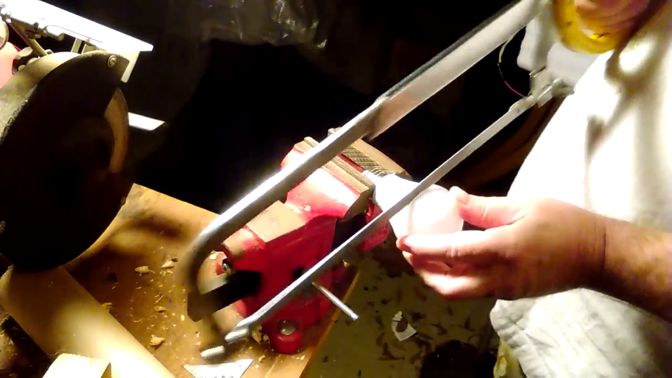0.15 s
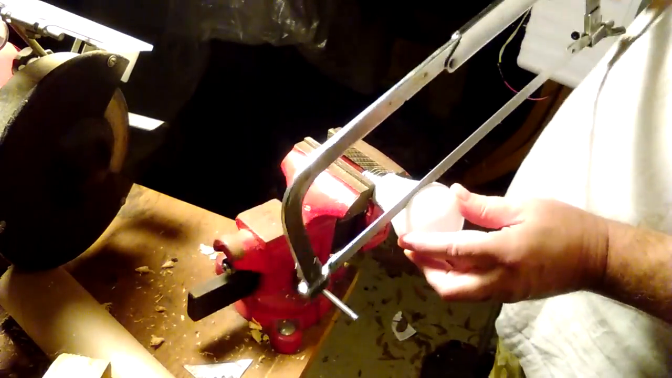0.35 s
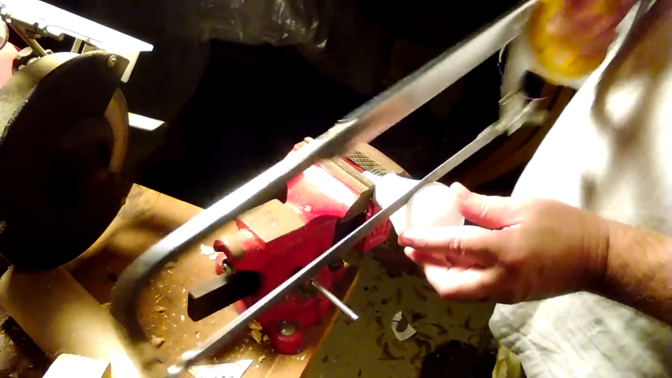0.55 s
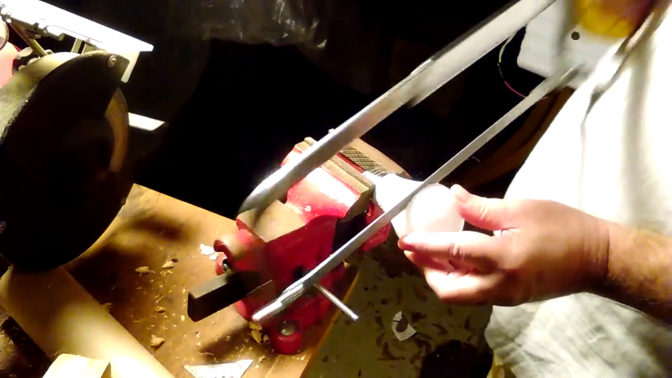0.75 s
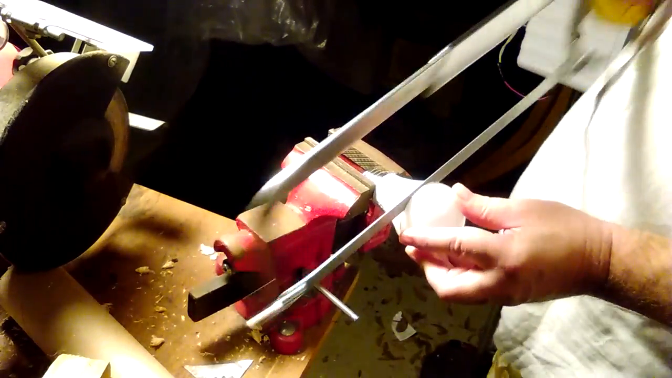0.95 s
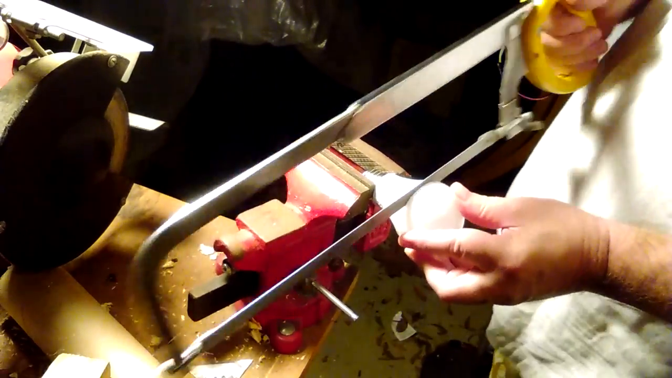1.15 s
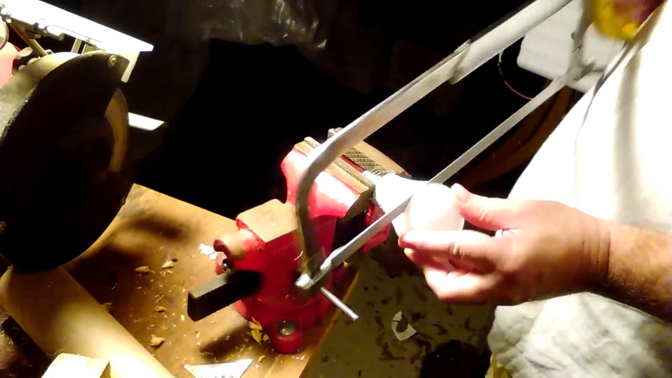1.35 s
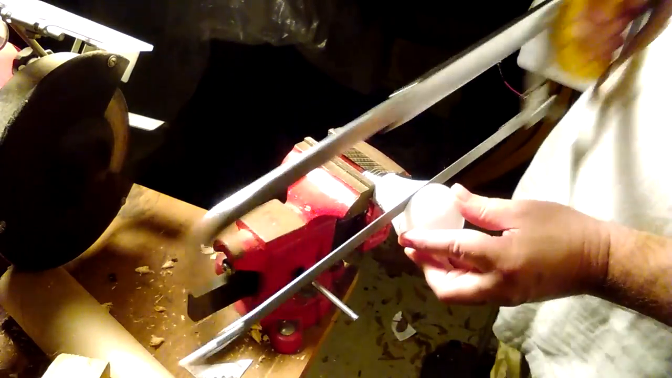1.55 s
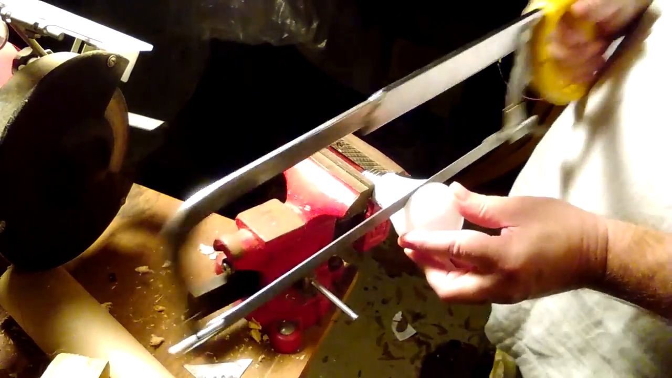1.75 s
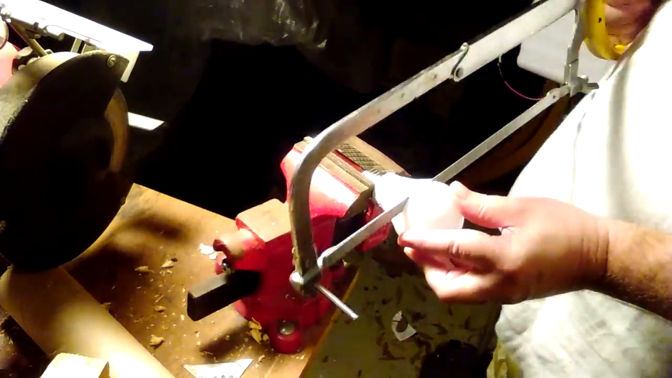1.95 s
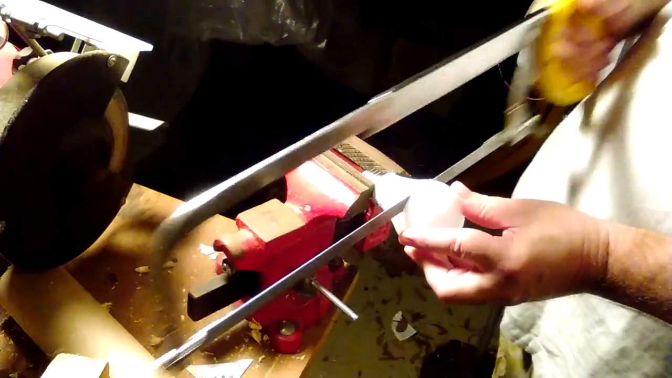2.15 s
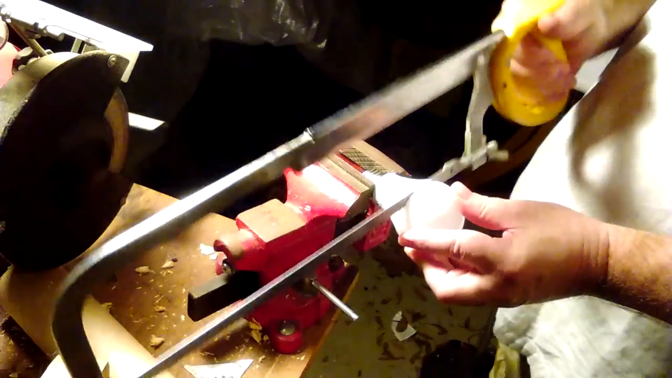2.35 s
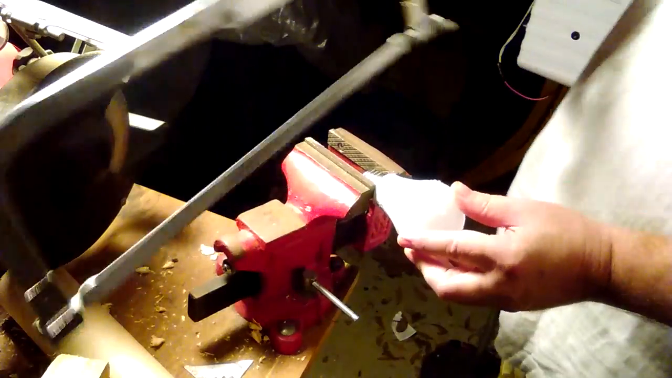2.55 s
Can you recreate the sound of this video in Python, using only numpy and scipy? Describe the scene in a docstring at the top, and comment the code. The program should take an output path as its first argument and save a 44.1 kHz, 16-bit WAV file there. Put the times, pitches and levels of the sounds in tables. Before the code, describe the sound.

Loud, harsh hacksaw strokes grind through a clamped plastic piece, ending in a sharp metallic clack

```python
"""Hand hacksaw in plastic

A hand hacksaw cuts a plastic piece held in a vise, close by in a garage: eight strokes, pull and push in turn.
Teeth catch at a rate that follows the arm's speed: clicks drum on the piece, torn chips make the blade hiss and ring.
Shaped noise adds rasp, grinding, bench rumble and background. At the end the blade breaks through and the saw
clacks free, ringing its frame modes. The loud sound overloads the recorder a little: limiter, then soft clipping."""
import sys
import numpy as np
from scipy import signal
from scipy.fft import rfft, irfft
from scipy.io import wavfile

SR = 44100
rng = np.random.default_rng(int(sys.argv[2]) if len(sys.argv) > 2 else 0)


def pcm_store(signal):
    """Save signal as 16-bit PCM."""
    levels = np.round(np.clip(np.atleast_2d(signal), -1, 1) * 32767)
    wavfile.write(sys.argv[1], SR, levels.astype(np.int16).T)


N = 119070
T = np.arange(N) / SR

# steady background noise: (frequency [Hz], level [dB])
BACKGROUND_COLOUR = [(20, -5.5), (55, 0), (100, -3.5), (200, -13), (400, -20.5), (1000, -30), (3000, -36.5),
                     (7000, -35.5), (14000, -53.5)]
# saw knocks, finally clacks free: (time [s], level [dB], decay time [s])
KNOCKS = [(0.017, -30, 0.0041), (0.0324, -30, 0.0038), (0.067, -33.5, 0.0038), (0.1904, -18, 0.0032),
          (1.749, -11, 0.0036), (2.326, -12, 0.0061), (2.3454, -16, 0.0087), (2.411, -16.5, 0.014),
          (2.4302, -6.5, .005), (2.4368, -1.5, 0.0034), (2.622, -31.5, 0.0032), (2.6914, -51, 0.0017)]
# spectrum of a knock: (frequency [Hz], level [dB])
KNOCK_COLOUR = [(100, -10.5), (600, -19), (1300, 1.5), (2600, -7.5), (4400, 5), (6000, 7.5), (7700, 4.5),
                (9200, -15.5), (14000, -22)]
# modes of the free frame: (frequency [Hz], level [dB], T60 [s])
FRAME = [(1270, -44, .25), (1852, -49, 1.2), (3284, -46, .6), (3564, -32, .5), (3700, -38, .45),
         (4005, -42, .75), (4490, -43, .65), (7327, -33, .18), (7779, -34, .16)]
# piece shudders and bench rumbles, mostly near the turns of the arm:
# (time [s], rumble level [dB], Gaussian width [s], piece level [dB])
JOLTS = [(0.024, -40, 0.019, -38.5), (0.356, -23.5, 0.046, -23), (0.49, -29, 0.043, -40),
         (0.727, -24, 0.027, -21), (0.938, -23, 0.072, -28.5), (1.127, -38, 0.022, -19.5),
         (1.253, -29, 0.059, -29), (1.47, -24.5, 0.043, -30.5), (1.704, -27, .02, -31),
         (1.79, -23, 0.041, -25.5), (1.993, -19, 0.019, -43), (2.059, -16, 0.017, -15.5),
         (2.274, -28, 0.051, -20.5)]
# spectrum of the bench rumble: (frequency [Hz], level [dB])
JOLT_COLOUR = [(25, -29.5), (50, -2.5), (95, -5.5), (200, -10), (300, -17.5), (900, -39.5)]
# saw strokes, pull and push in turn: (start [s], end [s], rise [s], fall [s], top tooth rate [Hz],
# blade level [dB], piece level [dB], rasp level [dB], smoothness at top speed [0-1],
# blade level change over the stroke [dB], piece and rasp level change over the stroke [dB])
STROKES = [ (0.172, 0.407, 0.065, 0.07, 514.8, -7, -13, -17.5, 0.47, 1.5, 1.5),
           (0.410, 0.644, 0.084, 0.054, 572.4, -8, -16, -25.5, 0.4, -4.5, -13),
           (0.656, 0.954, 0.081, 0.072, 588.4, -6, -13.5, -16, 0.19, -2.5, -10.5),
           (0.935, 1.179, 0.05, 0.095, 629.2, -5, -15.5, -18.5, 0.18, -1.5, 9.5),
           (1.185, 1.486, 0.054, 0.094, 500.3, -5.5, -17, -16.5, 0.08, -2, 2.5),
           (1.451, 1.721, 0.045, 0.098, 721.7, -4.5, -10, -14.5, 0.82, 1.5, 7),
           (1.741, 2.085, 0.062, 0.04, 542, -4.5, -18.5, -16.5, .1, -2, 0.5),
           (2.019, 2.344, 0.06, 0.11, 641.8, -4, -16, -16, 0.68, -9.5, 7.5)]
# blade bite swells, or dips where negative: (time [s], blade level change [dB], Gaussian width [s])
CATCHES = [(0.344, -0.5, 0.0073), (0.57, 4, 0.018), (0.678, 7.5, 0.04), (0.974, 0, 0.0063),
           (1.098, 3.5, 0.0096), (1.24, 0.5, 0.013), (1.366, 4.5, 0.015), (1.429, 7, .008),
           (1.566, 2, 0.0069), (1.66, 1, 0.0091), (1.797, 0.5, 0.021), (1.982, 5, 0.013),
           (2.089, -2, 0.0052)]
# blade and frame resonances: (frequency [Hz], width [Hz], pull level [dB], push level [dB])
BLADE = [(3210, 126, -10.5, -9.5), (4052, 72, -9.5, -4), (4648, 283, -2.5, -3), (5233, 137, -1, -8),
         (5666, 180, -6, -34), (6050, 170, -1.5, -2), (6480, 210, 3, 3), (7300, 600, -6, -1.5),
         (7840, 1200, -21, -8.5), (9010, 300, -17.5, -15.5), (11030, 150, -24, -22)]
# resonances of the piece in the vise: (frequency [Hz], width [Hz], pull level [dB], push level [dB])
PIECE = [(203, 35, -10.5, -11), (386.3, 19, -2, 3), (434, 30, -6.5, -16), (492.6, 29, 4.5, 2.5),
         (601.7, 24.5, -2, 2.5), (665.6, 23.2, 2.5, 2.5), (718, 22, 5.5, -5), (760, 20, -1.5, 1.5),
         (930.5, 83, -9.5, -6.5), (1058, 66, 1, -3.5), (1266, 47, -13, -7)]
# broad hiss of the cut: (frequency [Hz], level [dB])
HISS = [(1500, -30.5), (3000, -8.5), (4500, 0.5), (6800, 1), (8200, -2), (9400, -14), (11500, -16),
        (14000, -34.5)]
# dull rasp of the plastic: (frequency [Hz], level [dB])
RASP = [(60, -24), (200, -10), (280, -9.5), (450, -2), (700, 0.5), (1100, -2), (1700, -2.5), (2600, -7.5),
        (4000, -18), (9000, -36.5)]
# plastic grinds coarsely: (time [s], level [dB], Gaussian width [s], frequency [Hz], width [Hz])
GRINDS = [(.76, -16, 0.024, 1150, 500), (1.343, -11.5, 0.031, 983, 110), (1.889, -13, 0.024, 1034, 130),
          (2.208, -15.5, 0.02, 1280, 300)]
# plucked last tooth: (frequency [Hz], level [dB], T60 [s])
PING = [(6083, -25, .11), (6826, -17, .06), (7547, -22, .06), (8166, -17, .055)]
# treble that differs between the ears: (frequency [Hz], level [dB])
SIDE_COLOUR = [(4000, -50), (5000, -9), (6600, 0), (7500, -3), (9000, -12), (11000, -18), (14000, -24)]

BACKGROUND_DB, HISS_DB = -34.5, -5.5
SIDE_DB = -12  # relative to the treble
KNOCK_PIECE_DB = -19.5  # share of a knock that reaches the piece
ROOM_T60_S, ROOM_DB, ROOM_BUILD_S = 0.35, -8, 0.0021
SPEED_ARC, FORCE_LAW = 0.42, 1.96  # exponents: speed arch, grip rise and fall
UNEVEN, SMOOTH_LAW = 0.2, 5.0  # tooth spacing scatter; how sharply it dies away towards top speed
TOOTH_SPREAD_DB, CHATTER_DB, CHATTER_HZ = 1.5, 1, 47
CHIP_DECAY_CYCLES, CHIP_SPREAD_DB = 1, 3.5
BLADE_CLICK, PIECE_CHIPS = 0.81, 1  # clicks in the blade drive, chips in the piece drive [gain]
SNAGS_PER_S, SNAG_DECAY_S, SNAG_DB = 39, 0.0017, 4
DRAG_DB = -26.5  # rubbing in the cut, before the shares for blade and rasp
WANDER_DB, WANDER_HZ = 2.5, 11.8  # blade resonances vary as the contact slides; the rate serves all
PING_S = 2.369
DRIVE_DB, LIMIT_DB, RELEASE_DB_PER_S, LIMIT_ATTACK_S = 0.5, 1, 383, 0.00092
CLIP_TOP, CLIP_HARDNESS = 1.0, 3.6
STOPBAND_HZ = 15800


def from_db(db):
    """Decibels to gain."""
    return 10 ** (np.asarray(db) / 20)


def rms_one(x):
    """Scale to unit rms."""
    return x / np.sqrt(np.mean(x ** 2) + 1e-20)


def drift(corner_hz):
    """Low-passed noise (double pole) of unit rms; the first second is dropped to settle."""
    r = np.exp(-2 * np.pi * corner_hz / SR)
    slow = signal.lfilter([1], [1, -2 * r, r * r], rng.standard_normal(N + SR))
    return rms_one(slow[SR:])


def colour(x, points):
    """Minimum-phase filter through (Hz, dB) points; white noise keeps its power."""
    size = 2 ** 18
    hz, db = np.transpose(points)
    bin_hz = np.arange(size // 2 + 1) * SR / size
    gain = from_db(np.interp(np.log(bin_hz + 1), np.log(hz), db))
    cepstrum = irfft(np.log(rms_one(gain)))
    cepstrum[1:size // 2] *= 2  # fold to causal
    response = np.exp(rfft(cepstrum[:size // 2], size))
    return irfft(rfft(x, size) * response)[:N]


def swell(centre_s, width_s):
    """Gaussian envelope with peak 1."""
    return np.exp(-0.5 * ((T - centre_s) / width_s) ** 2)


def impulse(time_s):
    """Single-sample strike."""
    return 1.0 * (np.arange(N) == int(time_s * SR))


def resonate(drive, modes, wander_db):
    """Parallel two-pole resonances, fed differently by pull and push, normalized for a white input."""
    out, power = 0, 0
    for k, (hz, width_hz, pull_db, push_db) in enumerate(modes):
        r = np.exp(-np.pi * width_hz / SR)
        top = (-1) ** k * (1 - r * r) / 2  # alternate signs
        x = from_db(pull_db) * drive[0] + from_db(push_db) * drive[1]
        x = x * from_db(wander_db * drift(WANDER_HZ))
        poles = [1, -2 * r * np.cos(2 * np.pi * hz / SR), r * r]
        out = out + signal.lfilter([top, 0, -top], poles, x + 1e-18)
        power += from_db(pull_db + push_db) * (1 - r)
    return out / np.sqrt(power)


def ring(strikes, modes):
    """Struck modes: each impulse starts exponentially decaying sines."""
    out = 0
    for hz, db, t60_s in modes:
        r = np.exp(-np.log(1000) / (t60_s * SR))
        w = 2 * np.pi * hz / SR
        poles = [1, -2 * r * np.cos(w), r * r]
        out = out + signal.lfilter([0, from_db(db) * np.sin(w)], poles, strikes + 1e-18)
    return out


def background():
    """Steady noise, strongest in the bass."""
    return from_db(BACKGROUND_DB) * colour(rng.standard_normal(N), BACKGROUND_COLOUR)


def knocks():
    """Decaying noise bursts of contact, which also drive the piece; impulses ring the frame."""
    envelope = sum(from_db(db) * (T >= s) * np.exp(-np.abs(T - s) / decay_s) for s, db, decay_s in KNOCKS)
    force = envelope * rng.standard_normal(N)
    taps = sum(from_db(db) * impulse(s) for s, db, _ in KNOCKS)
    piece = from_db(KNOCK_PIECE_DB) * resonate([force, force], PIECE, wander_db=3)
    return colour(force, KNOCK_COLOUR) + ring(taps, FRAME) + piece


def garage(x):
    """Dense reflections that build up quickly and die away, as convolution with shaped noise."""
    t = T[:SR]
    decay = np.exp(-np.log(1000) * t / ROOM_T60_S)
    build = 1 - np.exp(-t / ROOM_BUILD_S)
    tail = rng.standard_normal(SR) * decay * build
    return signal.fftconvolve(x, tail / np.sqrt(np.sum(tail ** 2)))[:N]


def bench():
    """Low noise swells from the jolted bench; the same swells shudder the piece in the vise."""
    rumble = sum(from_db(db) * swell(s, width_s) for s, db, width_s, _ in JOLTS)
    shudder = sum(from_db(db) * swell(s, width_s) for s, _, width_s, db in JOLTS)
    rumble = rumble * rng.standard_normal(N)
    shudder = shudder * rng.standard_normal(N)
    piece = resonate([shudder, shudder], PIECE[:8], wander_db=0)
    return colour(rumble, JOLT_COLOUR) + from_db(-1.5) * piece


def teeth(rate_hz, uneven):
    """A click for each tooth, and the decaying noise burst of tearing chips that follows it."""
    phase = np.cumsum(rate_hz * np.exp(uneven * drift(160))) / SR
    tooth = phase.astype(int)
    size = from_db(TOOTH_SPREAD_DB * rng.standard_normal(N))[tooth]
    clicks = np.diff(tooth, prepend=0) * size
    grain = rng.standard_normal(N) * from_db(CHIP_SPREAD_DB * rng.standard_normal(N))
    chips = size * np.exp(-(phase % 1) / CHIP_DECAY_CYCLES) * grain
    moving = rate_hz > 0
    return clicks / clicks[moving].std(), chips / chips[moving].std()


def snags():
    """A tooth snags and lets go: decaying noise bursts at random moments."""
    hits = 1.0 * (rng.random(N) < SNAGS_PER_S / SR)
    envelope = signal.lfilter([1], [1, -np.exp(-1 / (SNAG_DECAY_S * SR))], hits + 1e-18)
    return from_db(SNAG_DB) * envelope * rng.standard_normal(N)


def sawing():
    """Each stroke speeds up and slows down; its teeth drive blade and piece resonances, hiss and rasp."""
    blade, piece, rasp = np.zeros((2, N)), np.zeros((2, N)), 0  # rows: pull, push
    chatter, snag = from_db(CHATTER_DB * drift(CHATTER_HZ)), snags()
    for k, stroke in enumerate(STROKES):
        start_s, end_s, rise_s, fall_s, top_hz, blade_db, piece_db, rasp_db = stroke[:8]
        smooth, blade_lean_db, piece_lean_db = stroke[8:]
        along = np.clip((T - start_s) / (end_s - start_s), 0, 1)
        speed = (4 * along * (1 - along)) ** SPEED_ARC
        rough = 1 - np.clip(smooth, 0, 1) * speed ** SMOOTH_LAW
        rise = np.clip((T - start_s) / rise_s, 0, 1)
        fall = np.clip((end_s - T) / fall_s, 0, 1)
        grip = chatter * (rise * fall) ** FORCE_LAW
        clicks, chips = teeth(top_hz * speed, UNEVEN * rough)

        blade_gain = from_db(blade_db + blade_lean_db * (along - 0.5)) * grip * 0.45
        blade[k % 2] += blade_gain * (chips + BLADE_CLICK * clicks + snag)
        press = grip * from_db(piece_lean_db * (along - 0.5))
        piece[k % 2] += from_db(piece_db) * press * (clicks + PIECE_CHIPS * rough * chips) * 0.73
        scrape = 0.32 * rough * clicks + chips + 2.1 * snag
        rasp = rasp + from_db(rasp_db) * press * np.sqrt(rough) * scrape
    blade *= from_db(sum(db * swell(s, width_s) for s, db, width_s in CATCHES))

    # rubbing runs on through the turns
    first, last = STROKES[0], STROKES[-1]
    in_cut = (T > first[0] + first[2]) & (T < last[1] - last[3])
    drag = from_db(DRAG_DB) * in_cut * chatter * rng.standard_normal(N)
    blade[0] += 0.5 * drag
    rasp = rasp + from_db(-6.5) * drag

    # random signs turn the drive into noise with the same envelope
    hiss = from_db(HISS_DB) * colour(blade.sum(0) * rng.choice([-1, 1], N), HISS)
    highpass = signal.butter(2, 40, "high", fs=SR, output="sos")
    rasp = signal.sosfilt(highpass, colour(rasp, RASP))
    return resonate(blade, BLADE, WANDER_DB) + hiss + resonate(piece, PIECE, wander_db=4.0) + rasp


def grinds():
    """Short noise swells of coarse grinding, each in one resonance of the plastic."""
    out = 0
    for s, db, width_s, hz, bandwidth_hz in GRINDS:
        drive = from_db(db) * swell(s, width_s) * rng.standard_normal(N)
        out = out + resonate([drive, 0 * drive], [(hz, bandwidth_hz, 0, 0)], wander_db=3)
    return out


def ping():
    """The last tooth is plucked: one impulse into short, high modes."""
    return ring(impulse(PING_S), PING)


def treble_side(mid):
    """Left-right difference: treble turned to noise by random signs, keeping its envelope."""
    treble = signal.sosfilt(signal.butter(2, 3500, "high", fs=SR, output="sos"), mid)
    return from_db(SIDE_DB) * colour(treble * rng.choice([-1, 1], N), SIDE_COLOUR)


def scene():
    """Saw, bench, room and background in the centre; only the treble spreads to the sides."""
    near = knocks() + sawing() + grinds() + ping()
    mid = background() + near + from_db(ROOM_DB) * garage(near) + bench()
    side = treble_side(mid)
    return np.array([mid + side, mid - side])


def record(dry):
    """A fast limiter holds the level, what slips through is soft-clipped, and the top is cut."""
    x = dry * from_db(DRIVE_DB)
    over_db = np.maximum(20 * np.log10(np.abs(x).max(0) + 1e-9) - LIMIT_DB, 0)
    release_db = RELEASE_DB_PER_S * T
    held_db = np.maximum.accumulate(over_db + release_db) - release_db
    r = np.exp(-1 / (LIMIT_ATTACK_S * SR))
    x = x * from_db(-signal.lfilter([1 - r], [1, -r], held_db))
    x = x / (1 + np.abs(x.mean(0) / CLIP_TOP) ** CLIP_HARDNESS) ** (1 / CLIP_HARDNESS)
    return signal.sosfilt(signal.cheby2(12, 70, STOPBAND_HZ, fs=SR, output="sos"), x)


dry = scene()
out = record(dry)
pcm_store(out)
```